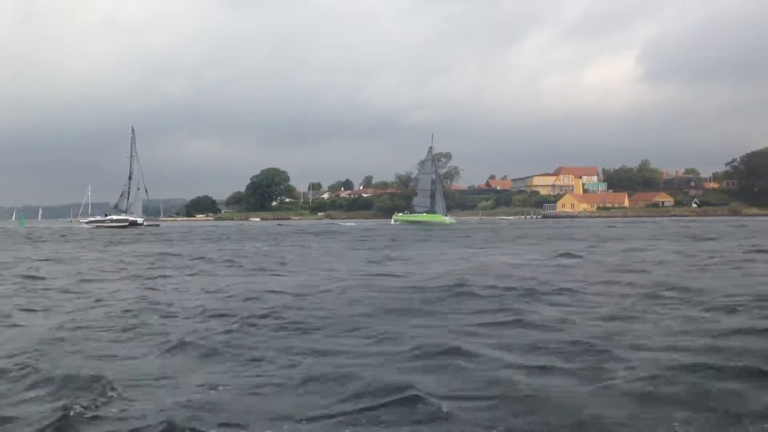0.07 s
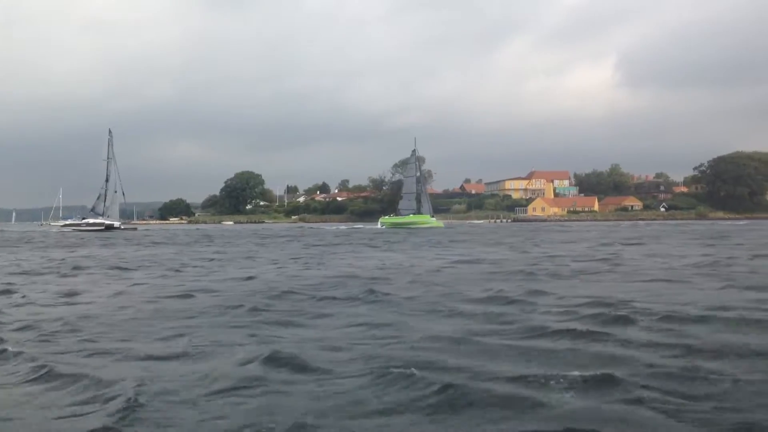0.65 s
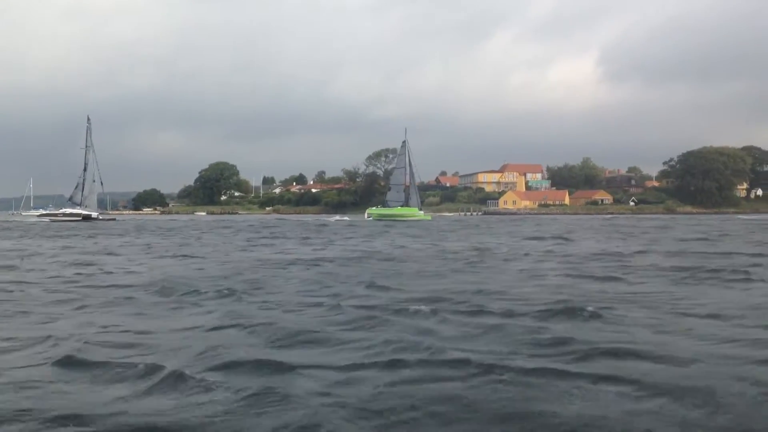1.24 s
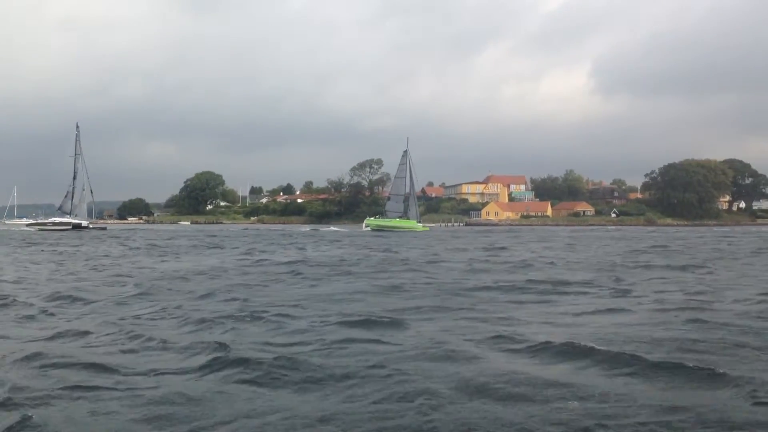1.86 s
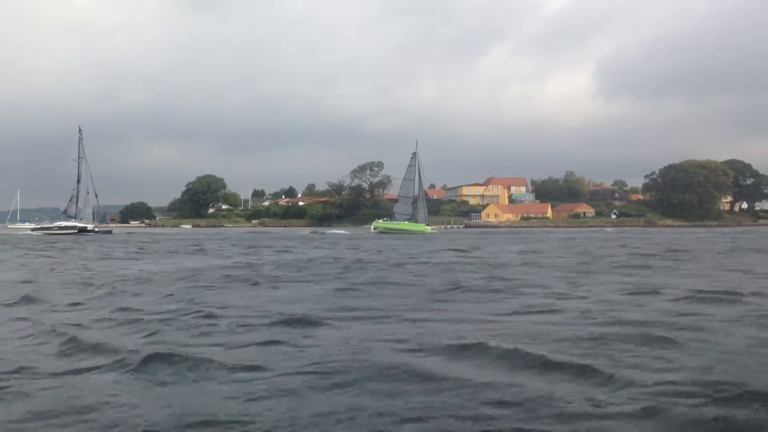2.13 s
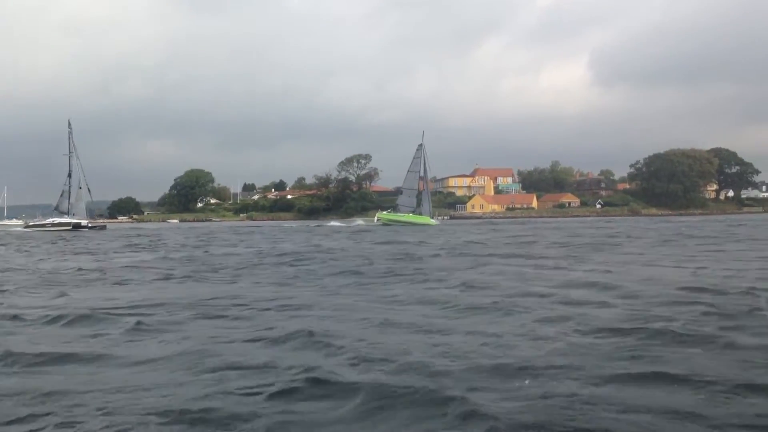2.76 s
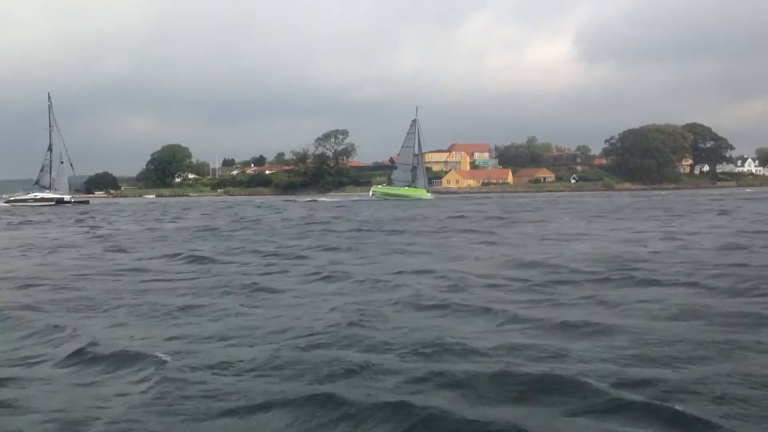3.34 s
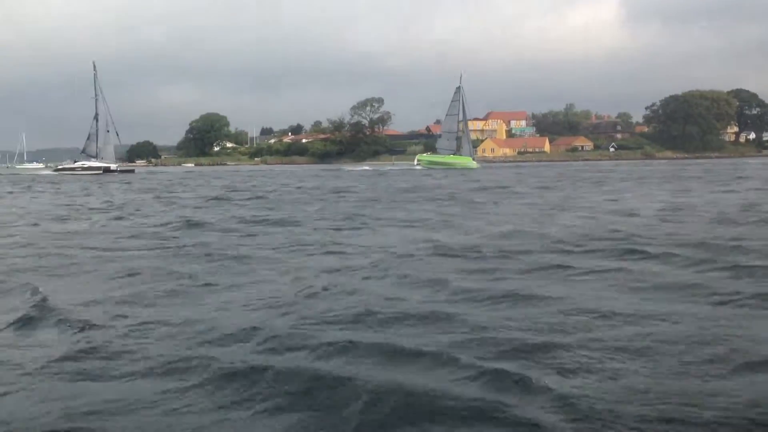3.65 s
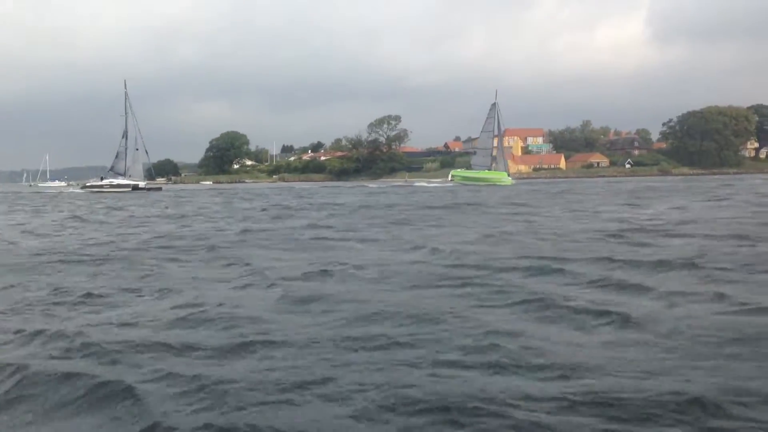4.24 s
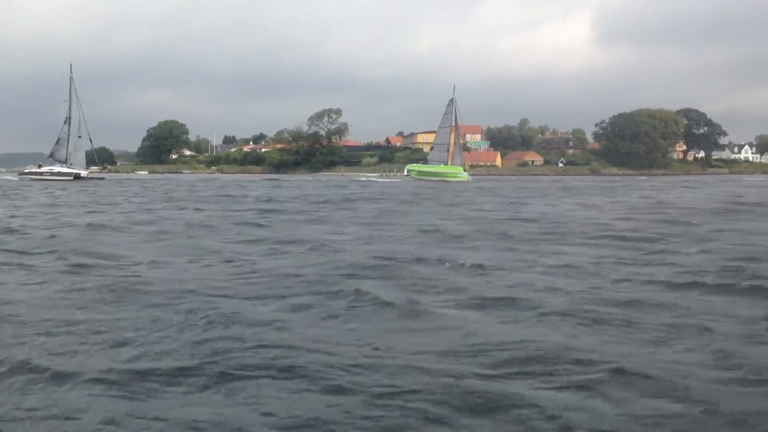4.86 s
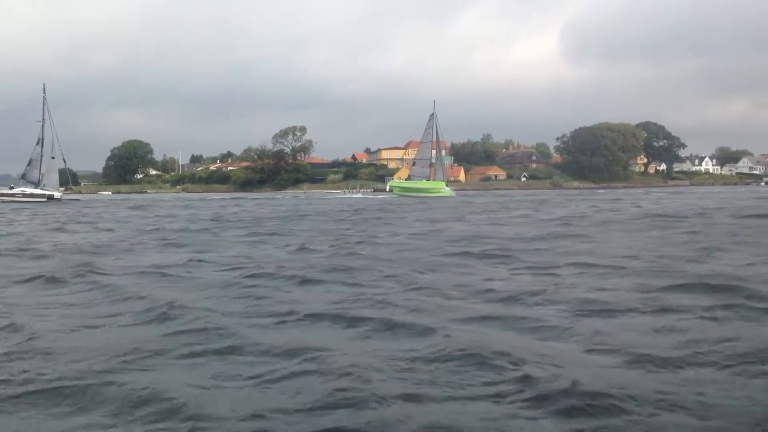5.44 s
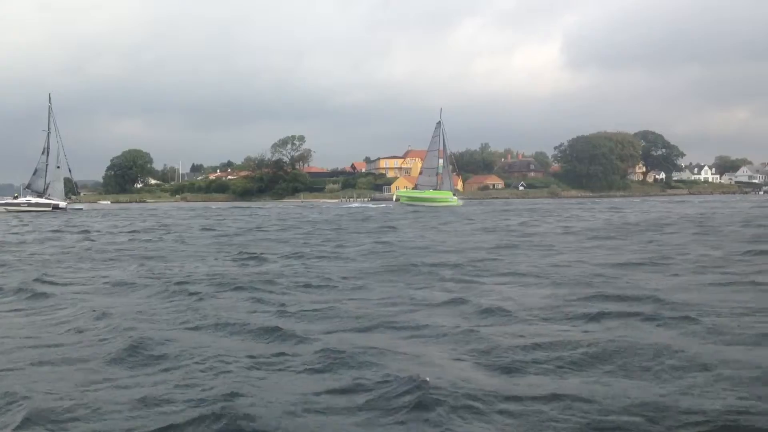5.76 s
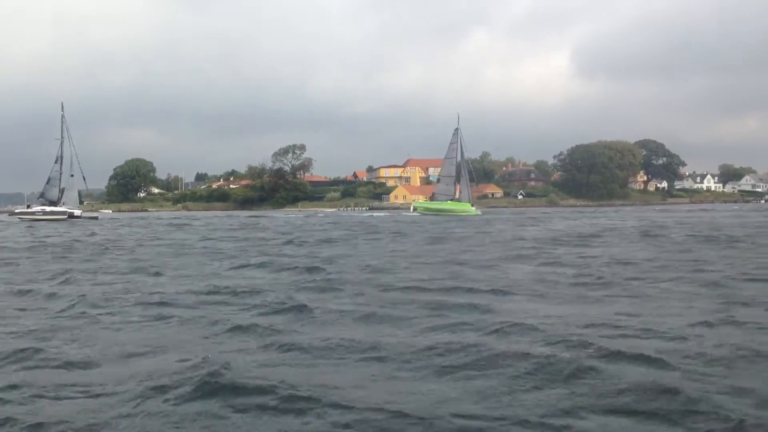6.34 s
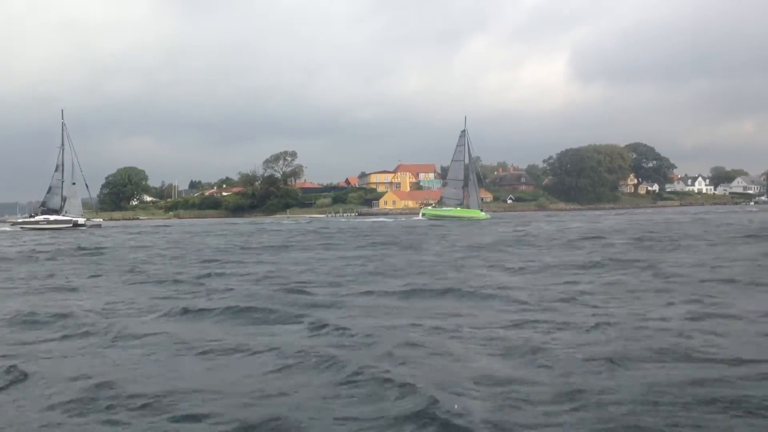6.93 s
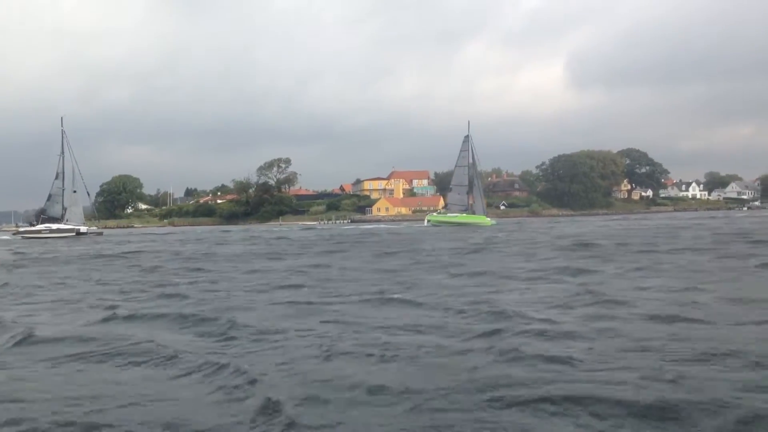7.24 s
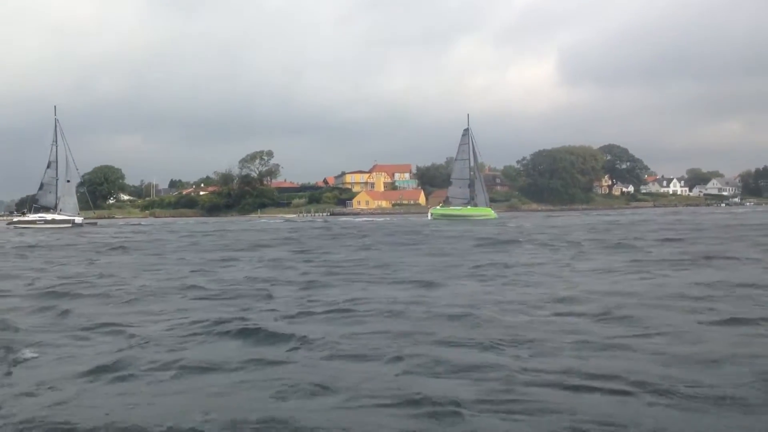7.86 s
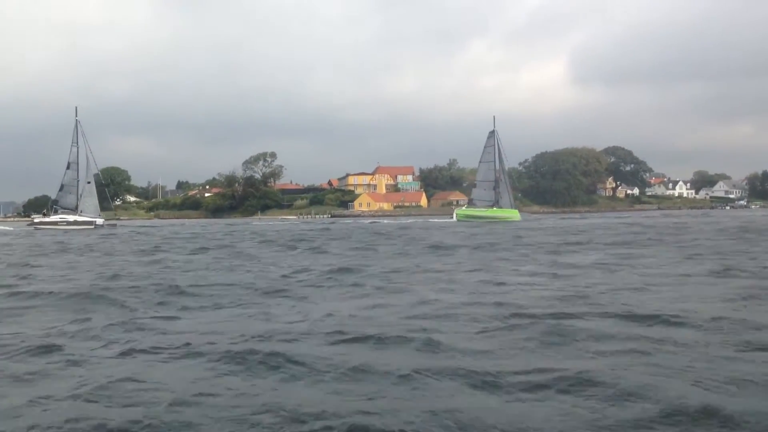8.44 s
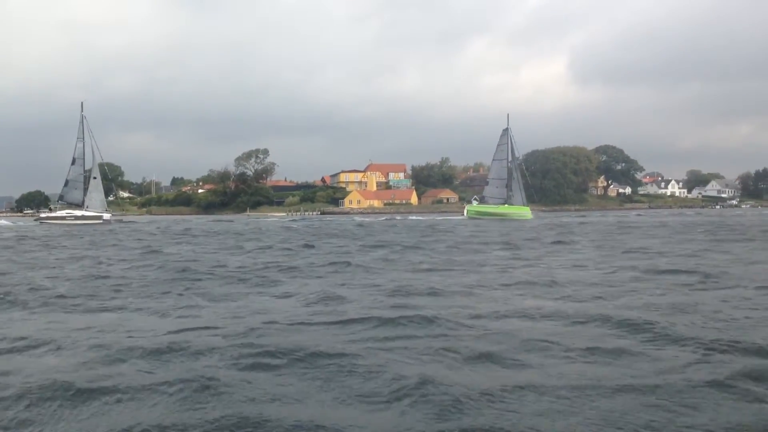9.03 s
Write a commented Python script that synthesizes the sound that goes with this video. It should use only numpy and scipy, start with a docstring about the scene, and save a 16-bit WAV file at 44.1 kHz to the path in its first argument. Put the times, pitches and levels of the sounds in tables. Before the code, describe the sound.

A motorboat engine drones at a steady speed for the whole nine seconds, heard from on board through one microphone. It is a low hum with a rough throb and a boom in the hull. Beneath it, choppy water washes along the side with a fizzing spray, swelling roughly every half second, most clearly around 2.1, 3.5, 4.6 and 7 seconds. Water also slops hollowly against the hull, most at about 4 to 4.5 seconds. One tiny drop ticks close by at 0.6 seconds. Wind rumbles on the microphone in uneven gusts from the start, with the hardest low thumps between about 1.9 and 3 seconds. Lighter gusts and bumps follow around 4 to 5.2, 6.5 and 7.3 to 8 seconds. The wind then eases while the engine and water carry on.

```python
"""A four-cylinder engine drones at a steady speed, heard from on board a motorboat in choppy water.
Its unequal firings throb and boom in the hull. Along the side the bow wave washes and fizzes,
swelling with each wave, and water slops hollowly against the boat; one drop ticks close by.
Gusts of wind rumble and thump right on the single microphone."""
import sys
import numpy as np
from scipy import signal
from scipy.fft import rfft, irfft, next_fast_len
from scipy.io import wavfile
from scipy.ndimage import uniform_filter1d, map_coordinates

SR = 44100
rng = np.random.default_rng(int(sys.argv[2]) if len(sys.argv) > 2 else 0)


def dump(signal):
    """Clip the signal to [-1, 1] and save it as 16-bit WAV at the path in sys.argv[1]."""
    limited = np.clip(np.atleast_2d(signal).T, -1, 1)
    pcm = np.round(limited * 32767).astype(np.int16)
    wavfile.write(sys.argv[1], SR, pcm)


N = 400869

# waves breaking along the side: (crest time [s], length [s], relative level [dB])
WAVE_CRESTS = [(0.58, 0.12, -50.5), (1.18, 0.71, -49), (1.71, 0.24, -47), (2.12, 0.32, -44.5),
               (2.45, 0.27, -47), (2.8, 0.29, -46.5), (3.08, 0.27, -48), (3.55, 0.21, -44.5),
               (4.07, 0.25, -46.5), (4.63, 0.27, -43), (5.52, 0.32, -48), (5.75, 0.22, -47),
               (6.1, 0.17, -47), (6.48, 0.24, -47), (7.0, 0.26, -43.5), (7.43, 0.34, -47),
               (7.75, 0.25, -46.5)]
# water slopping against the hull: (crest time [s], length [s], relative level [dB])
HULL_SLOPS = [(1.09, 0.16, -46.5), (1.45, 0.6, -49), (2.5, 0.3, -50), (2.84, 0.32, -46),
              (4.05, 0.097, -43.5), (4.19, 0.1, -44.5), (4.53, 0.31, -40), (5.04, 0.17, -48.5),
              (7.6, 0.5, -50)]
# a drop landing near the microphone: (time [s], relative level [dB])
NEAR_DROPS = [(0.6027, -39)]
# hiss of the spray: (frequency [Hz], relative level [dB])
SPRAY_SPECTRUM = [(1500, -3), (4000, -5), (5500, 3), (6200, -1.5), (7200, 2.5), (8100, -1.5), (9500, 1.5),
                  (11500, -4), (13000, -2), (15200, -7.5)]
# rush of the bow wave: (frequency [Hz], relative level [dB])
WASH_SPECTRUM = [(150, -12), (550, 2), (900, -3), (1300, 1), (1650, -2), (2000, 2.5), (2800, 0.5),
                 (3450, -4), (4000, -3), (5200, -10), (6300, -20), (15000, -41)]
# hollow colour of the slop: (frequency [Hz], relative level [dB])
SLOP_SPECTRUM = [(200, -14), (450, 0.5), (720, 0), (950, -1), (1300, -4), (1700, -12), (3000, -27),
                 (8000, -60)]
# light wind between the gusts: (time [s], relative level [dB])
BREEZE_LEVELS = [(0, -40), (2.5, -35.5), (5, -38), (5.9, -43), (7.6, -42), (8.4, -50), (9.09, -49)]
# gusts on the microphone: (start time [s], length [s], relative level [dB])
WIND_GUSTS = [(0.137, 0.056, -24.5), (0.315, 0.18, -25.5), (0.836, 0.04, -28), (1.0, 0.36, -23.5),
              (1.51, 0.11, -27.5), (1.814, 0.14, -24.5), (2.02, 0.25, -21.5), (2.386, 0.22, -19),
              (2.762, 0.27, -25), (3.22, 0.04, -26), (3.885, 0.38, -30), (4.422, 0.4, -29.5),
              (5.19, 0.05, -22), (5.63, 0.04, -33), (6.42, 0.08, -26.5), (6.62, 0.18, -33),
              (7.29, 0.48, -29.5), (7.974, 0.18, -30.5), (8.636, 0.043, -30.5)]
# the hardest thumps of wind: (time [s], relative level [dB])
WIND_BUFFETS = [(0.186, -15), (0.326, -10), (0.447, -9.5), (1.085, -11), (1.309, -5.5), (1.919, -3.5),
                (2.067, 1.5), (2.195, -6), (2.39, -1), (2.484, -4), (2.85, -4), (2.986, -12), (4.441, -11),
                (5.217, -15.5), (6.444, -14), (7.741, -16)]
# deep wind rumble: (frequency [Hz], relative level [dB])
RUMBLE_SPECTRUM = [(12, -26), (25, -13), (45, 0), (65, 3.5), (110, -1.5), (170, -9.5), (300, -18),
                   (600, -30.5), (1500, -57), (4000, -90)]
# flapping of small eddies: (frequency [Hz], relative level [dB])
FLAP_SPECTRUM = [(50, -10), (130, 3), (220, -3), (350, -10.5), (800, -27.5), (3000, -74)]
# engine speed: (time [s], four-stroke cycle rate [Hz])
ENGINE_SPEED = [(0, 24.35), (1, 24.5), (2.4, 24.5), (3.4, 24.35), (5.4, 24.45), (6.2, 24.3), (7.5, 24.38),
                (9.09, 24.3)]
# the four firings: (position [share of the cycle], strength [ratio])
FIRINGS = [(0, 1), (.25, .5), (.5, .3), (.75, .45)]
# engine tones, the fourth at the firing rate: (order [multiple of the cycle rate], relative level [dB])
ENGINE_ORDERS = [(1, -38), (2, -28), (3, -21), (4, 0), (5, -25.5), (6, -32), (7, -16.5), (8, -17.5),
                 (9, -16), (10, -24.5), (11, -23.5), (12, -17), (13, -22.5), (14, -47), (15, -22.5),
                 (16, -20), (17, -26), (18, -26), (19, -21), (20, -16), (21, -18), (22, -23), (23, -51),
                 (24, -44), (25, -58), (26, -65), (27, -55), (28, -57), (29, -48), (30, -38.5), (31, -47),
                 (32, -48), (33, -32.5), (34, -37), (35, -40.5), (36, -32)]
# hull and engine box resonances: (frequency [Hz], width [Hz], gain [dB])
HULL_MODES = [(188, 69, -11), (333, 56, 11.5), (479.7, 17.3, 17.5), (758, 120, -1)]

WASH_FLOOR_DB = -46  # the steady bow wave between crests


def amp(db):
    """Decibels as an amplitude ratio."""
    return 10 ** (np.asarray(db) / 20)


def unit(x):
    """x at rms 1."""
    return x / np.sqrt(np.mean(x ** 2) + 1e-20)


def curve(rows):
    """(time, value) points joined by straight lines, one value a sample."""
    return np.interp(np.arange(N) / SR, *np.transpose(rows))


def wobble(rate):
    """A smooth random curve, rate knots a second."""
    knots = rng.standard_normal(int(N * rate / SR) + 4)
    return map_coordinates(knots, [np.arange(N) * rate / SR])


def filtered(x, response):
    """x through a complex frequency response."""
    size = next_fast_len(N + SR // 2)
    return irfft(rfft(x, size) * response(np.fft.rfftfreq(size, 1 / SR)), size)[:N]


def coloured(x, spectrum):
    """x shaped by (frequency [Hz], level [dB]) points on a log axis, at rms 1."""
    points_hz, db = np.transpose(spectrum)
    return unit(filtered(x, lambda hz: amp(np.interp(np.log(hz + 1), np.log(points_hz), db))))


def patchy_noise(depth_db):
    """White noise with shallow patches of random gain in time and frequency."""
    bins = signal.stft(rng.standard_normal(N), nperseg=512)[2]
    patches = uniform_filter1d(rng.standard_normal(bins.shape), size=6, axis=0)
    patches = uniform_filter1d(patches, size=10, axis=1)
    return unit(signal.istft(bins * amp(depth_db * unit(patches)), nperseg=512)[1][:N])


def swells(waves, floor_db, rise_share=0.4):
    """Level in dB of a steady flow plus waves that each build to a crest and drain away."""
    t = np.arange(N) / SR
    power = amp(floor_db) ** 2
    for crest, length, db in waves:
        width = length * np.where(t < crest, rise_share, 1 - rise_share)
        power += amp(db) ** 2 * np.exp(-((t - crest) / width) ** 2)
    return 10 * np.log10(power)


def spray(floor_db=-60, growth=1.25, flicker_db=0.9, droplets_per_s=1000, spread_db=4):
    """Spray falling alongside: a hiss with tiny droplet ticks that swells more steeply than the wash."""
    landings = rng.random(N) < droplets_per_s / SR
    ticks = landings * rng.standard_normal(N) * amp(spread_db * rng.standard_normal(N))
    fizz = rng.standard_normal(N) + .31 * unit(ticks)
    surge_db = swells(WAVE_CRESTS, WASH_FLOOR_DB) - WASH_FLOOR_DB
    return amp(floor_db + growth * surge_db + flicker_db * wobble(14)) * coloured(fizz, SPRAY_SPECTRUM)


def drops(life_s=.0005):
    """A drop hitting the boat close to the microphone is one tiny bright tick."""
    t = np.arange(N) / SR
    envelope = sum(amp(db) * np.exp(-abs(t - at) / life_s) for at, db in NEAR_DROPS)
    return .5 * envelope * coloured(rng.standard_normal(N), SPRAY_SPECTRUM)


def water(wash_gain_db=1):
    """The bow wave rushes along the side, with a hollower slop where waves meet the hull."""
    wash_db = swells(WAVE_CRESTS, WASH_FLOOR_DB) + wash_gain_db + 0.5 * wobble(22)
    slop_db = swells(HULL_SLOPS, floor_db=-50) + 0.7 * wobble(16)
    wash = amp(wash_db) * coloured(patchy_noise(depth_db=0.92), WASH_SPECTRUM)
    slop = amp(slop_db) * coloured(patchy_noise(depth_db=2.5), SLOP_SPECTRUM)
    return wash + slop


def gusts(attack_s=0.026, release_s=0.036):
    """Wind strength on board: each gust rises quickly out of the breeze, holds and drops away."""
    t = np.arange(N) / SR
    power = amp(curve(BREEZE_LEVELS)) ** 2
    for start, length, db in WIND_GUSTS:
        end = start + length
        shape = np.interp(t, [start - attack_s, start, end, end + release_s], [0, 1, 1, 0])
        power += (amp(db) * shape) ** 2
    return np.sqrt(power)


def wind(rumble_gain_db=0.5, flap_gain_db=-9, lumps_db=3):
    """Turbulence on the microphone: a lumpy rumble in the gusts, and smaller eddies flapping around them."""
    strength = gusts()
    rumble = coloured(rng.standard_normal(N), RUMBLE_SPECTRUM) * amp(lumps_db * wobble(35))
    flaps = coloured(rng.standard_normal(N), FLAP_SPECTRUM) * amp(lumps_db * wobble(45))
    smoothed = uniform_filter1d(strength, size=SR // 8)
    return amp(rumble_gain_db) * strength * unit(rumble) + amp(flap_gain_db) * smoothed * unit(flaps)


def buffets(gain_db=-4, typical_hz=88, width_s=0.0072):
    """A large eddy passing the microphone is one short push and pull of pressure."""
    out, t = np.zeros(N), np.arange(N) / SR
    for at, db in WIND_BUFFETS:
        eddy_hz = typical_hz * np.exp(0.18 * rng.standard_normal())
        swing = np.sin(2 * np.pi * eddy_hz * (at - t))
        out += amp(db + gain_db) * swing * np.exp(-((t - at) / width_s) ** 2)
    return out


def hull(hz):
    """Complex response of the hull and engine box, a sum of ringing resonances."""
    return sum(amp(db) * 1j * hz * width / (centre ** 2 - hz ** 2 + 1j * hz * width)
               for centre, width, db in HULL_MODES)


def chug(cycle, level_db=-39.5, decay_cycles=0.46, uneven_db=1, box_hz=1100):
    """Each firing sends a rough puff through the hull's resonances; the engine box muffles its treble."""
    puffs = sum(strength * np.exp(-((cycle - at) % 1) / decay_cycles) for at, strength in FIRINGS)
    bursts = puffs * amp(uneven_db * wobble(40)) * rng.standard_normal(N)
    muffled = filtered(bursts, lambda hz: hull(hz) / np.hypot(1, (hz / box_hz) ** 2))
    return amp(level_db) * unit(muffled)


def drone(cycle, firing_db=-25.5, orders_db=-27, waver_db=0.03, flutter=.2, boom_hz=490):
    """Engine orders: unequal firings fill in the lines around the firing tone and make the hull throb."""
    phase = 2 * np.pi * cycle
    out = amp(firing_db + waver_db * wobble(5.7)) * np.cos(len(FIRINGS) * phase)
    mean_rate = np.mean([rate for _, rate in ENGINE_SPEED])
    for order, db in ENGINE_ORDERS:
        if order == len(FIRINGS):
            continue
        hz = order * mean_rate
        pattern = sum(strength * np.exp(-2j * np.pi * order * at) for at, strength in FIRINGS)
        # orders near the hull's boom arrive nearly in step; the others take their own paths through the boat
        scatter = min(1.2, .35 + 2 * abs(np.log2(hz / boom_hz)))
        offset = np.angle(pattern * hull(hz)) + scatter * rng.standard_normal()
        # higher orders are less steady from cycle to cycle
        sway = 1 + flutter * np.sqrt(order / 20) * (wobble(9) + 1j * wobble(9))
        out += amp(orders_db + db) * np.real(sway * np.exp(1j * (order * phase + offset)))
    return np.sqrt(2) * out  # makes the tone levels rms


def engine(tremble=0.001502):
    """The engine from on board: drone and chug follow one crankshaft, whose speed trembles slightly."""
    rate_hz = curve(ENGINE_SPEED) * (1 + tremble * wobble(12))
    cycle = np.cumsum(rate_hz) / SR
    return drone(cycle) + chug(cycle)


def scene():
    """Engine, water and wind at one microphone on the boat."""
    return (engine() + water() + spray() + drops() + wind() + buffets())[None]


def record(dry, low_cut_hz=38, top_hz=15300):
    """The microphone channel rolls off the deepest bass and keeps nothing above its band limit."""
    low_cut = signal.butter(2, low_cut_hz, "highpass", fs=SR, output="sos")
    thinned = signal.sosfilt(low_cut, dry[0])
    return filtered(thinned, lambda hz: hz < top_hz)[None]


dry = scene()
out = record(dry)
dump(out)
```